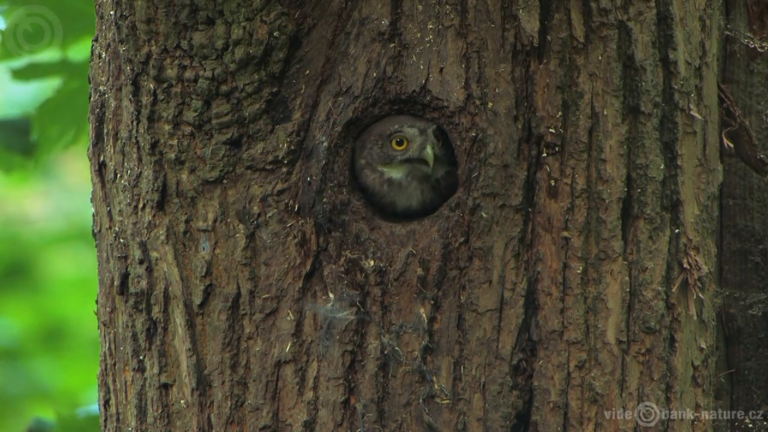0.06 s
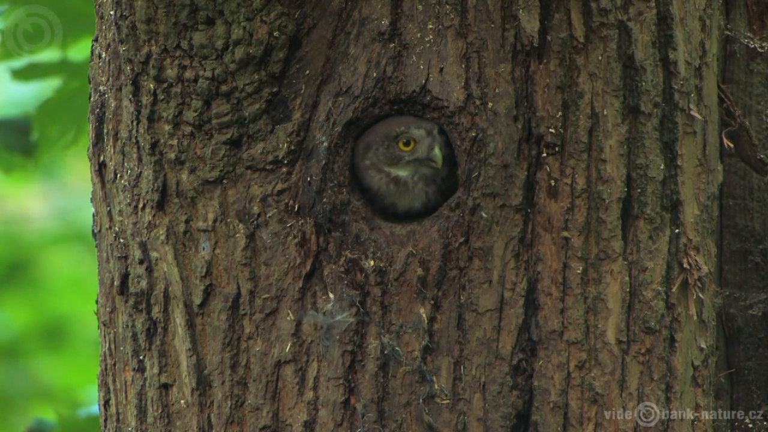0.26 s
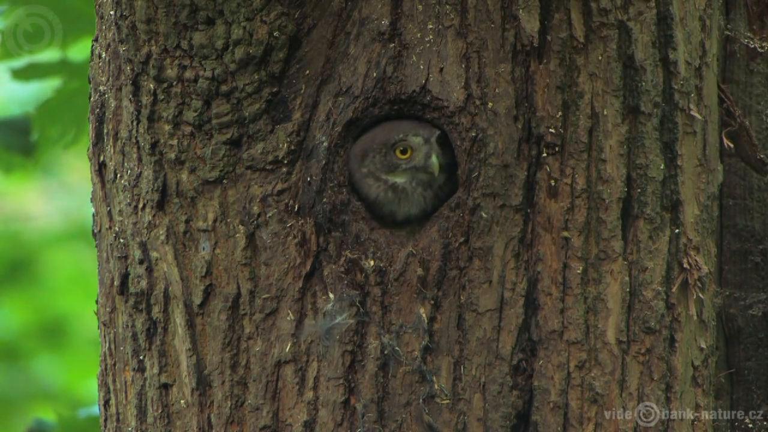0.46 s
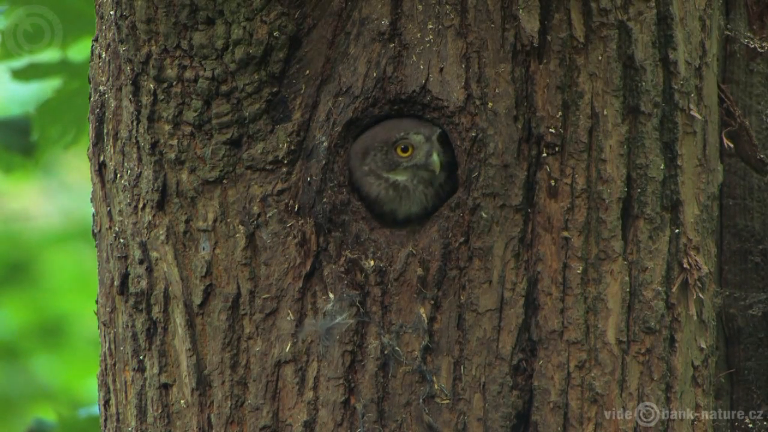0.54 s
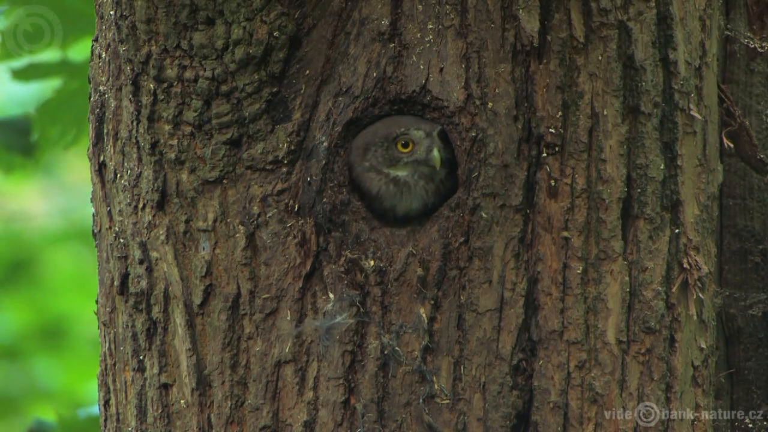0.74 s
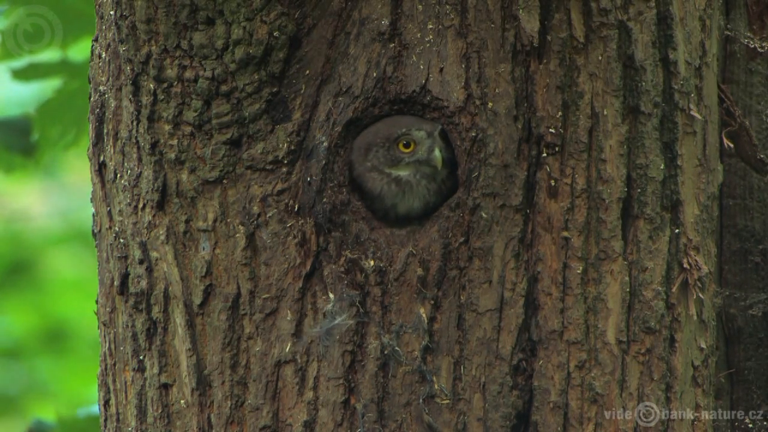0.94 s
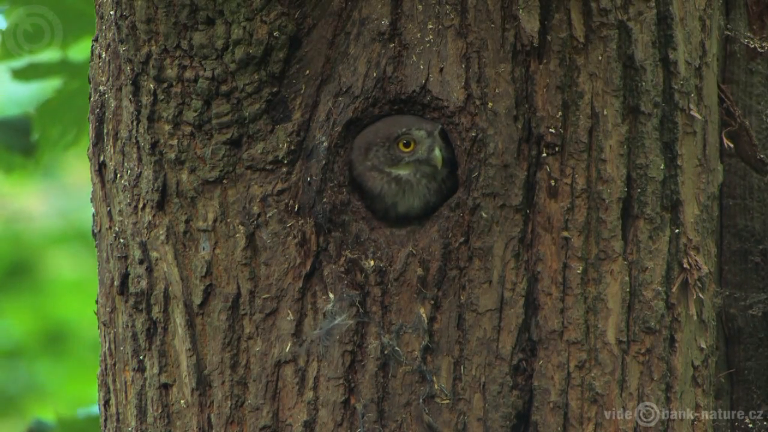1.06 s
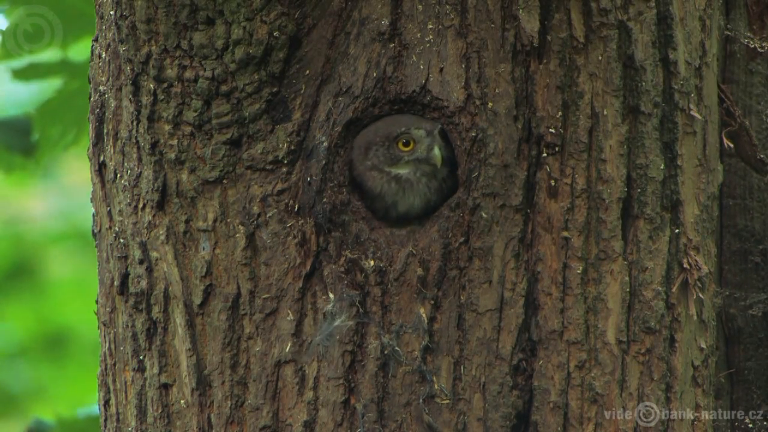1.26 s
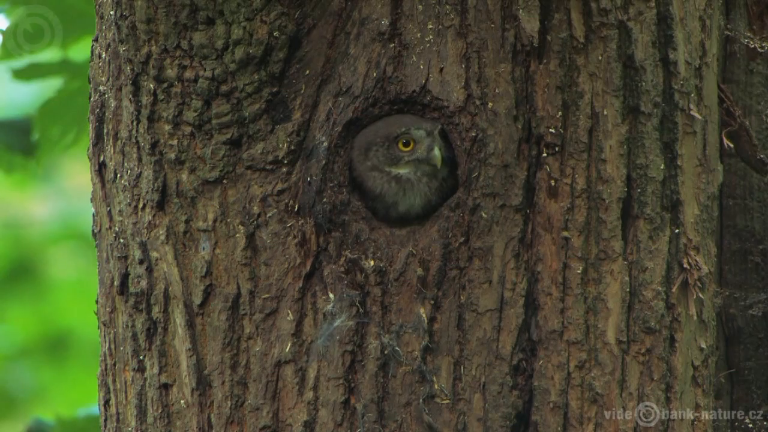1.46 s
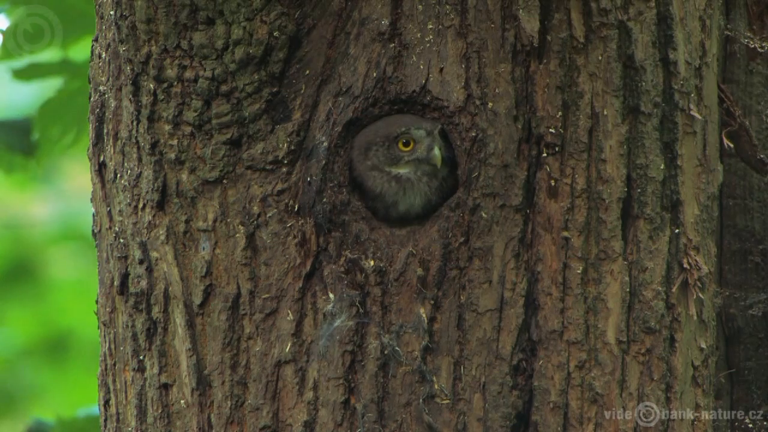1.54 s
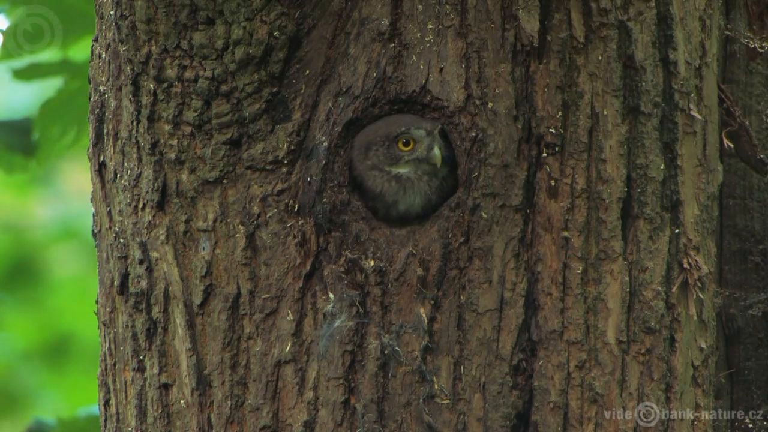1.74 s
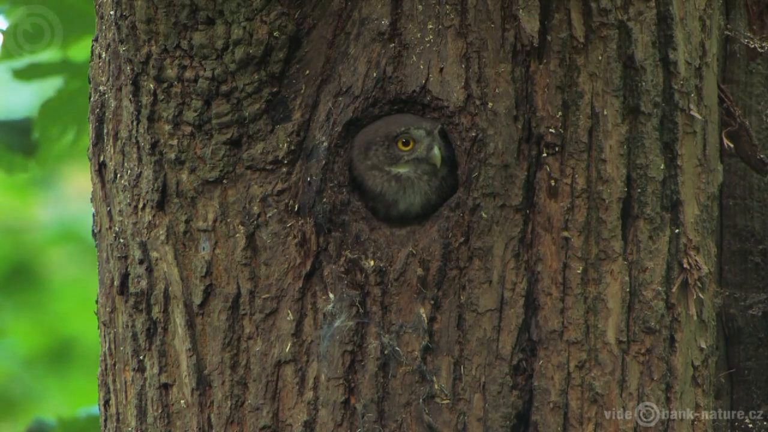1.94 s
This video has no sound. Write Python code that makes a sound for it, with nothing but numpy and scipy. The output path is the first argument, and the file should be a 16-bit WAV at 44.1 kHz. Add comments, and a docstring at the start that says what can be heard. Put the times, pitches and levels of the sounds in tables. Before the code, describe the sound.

In quiet woodland, a nearby owl whistles a brief, thin, very high note. About a second later it adds a softer trembling call that rises and falls, over distant birdsong, low hum and faint hiss.

```python
"""Woodland, with a distant rumble, a low hum and faint hiss, almost all centred on the microphone.
A thin, high whistle fades out at the start as, at 0.2 s, a pygmy owl gives one short, close note.
Far songbirds blur into a band around 3.5 kHz, and a faint low tone passes at 1 s.
From 1.2 s the owl whistles a longer, softer, quavering arch that the trunks scatter.
Just after it comes a soft tick in the undergrowth."""
import sys
import numpy as np
from scipy import signal
from scipy.fft import rfft, irfft
from scipy.io import wavfile
from scipy.ndimage import uniform_filter1d

SR = 44100
rng = np.random.default_rng(int(sys.argv[2]) if len(sys.argv) > 2 else 0)


def dump(signal):
    """Clip the signal to [-1, 1] and save it as 16-bit WAV at the path in sys.argv[1]."""
    limited = np.clip(np.atleast_2d(signal).T, -1, 1)
    pcm = np.round(limited * 32767).astype(np.int16)
    wavfile.write(sys.argv[1], SR, pcm)


N = 88200
LEAD = SR // 4  # samples before t = 0, so the wood is already ringing
TIME = np.arange(-LEAD, N) / SR


def from_db(db):
    """Decibels to gain."""
    return 10 ** (np.asarray(db) / 20)


def unit_rms(x):
    """Scale to rms 1."""
    return x / np.sqrt(np.mean(x ** 2) + 1e-20)


def curve(rows, column=1):
    """One column of a table, joined by straight lines in time."""
    rows = np.array(rows)
    return np.interp(TIME, rows[:, 0], rows[:, column])


def envelope(rows, column=1):
    """Smoothed gain from a level column, silent outside the table."""
    inside = (TIME >= rows[0][0]) & (TIME <= rows[-1][0])
    return uniform_filter1d(from_db(curve(rows, column)) * inside, size=60)


def wobble(rate_hz):
    """Random motion up to a given rate, rms 1."""
    sos = signal.butter(2, rate_hz, fs=SR, output="sos")
    return unit_rms(signal.sosfilt(sos, rng.standard_normal(len(TIME) + SR))[SR:])


def tremble(low_hz, high_hz):
    """Fast random flutter between two rates, rms 1."""
    sos = signal.butter(6, [low_hz, high_hz], "band", fs=SR, output="sos")
    return unit_rms(signal.sosfilt(sos, rng.standard_normal(len(TIME))))


def coloured(spectrum):
    """Steady noise with a given spectral shape, rms 1."""
    hz, db = np.transpose(spectrum)
    bins = np.maximum(np.fft.rfftfreq(len(TIME), 1 / SR), 1)
    shape = from_db(np.interp(np.log(bins), np.log(hz), db))
    return unit_rms(irfft(rfft(rng.standard_normal(len(TIME))) * shape, len(TIME)))


def scatter(x, t60_s, build_s):
    """Dense echoes that build up and die away, at unit power gain."""
    t = np.arange(SR) / SR
    echoes = rng.standard_normal(SR) * from_db(-60 * t / t60_s) * (1 - np.exp(-t / build_s))
    return signal.fftconvolve(x, echoes / np.sqrt(np.sum(echoes ** 2)))[:len(x)]


NEAR_T60_S, WOOD_T60_S, WOOD_BUILD_S = .2, .6, .0091
def woodland(x, direct_db, near_db, tail_db):
    """What reaches the microphone: direct sound, scatter from nearby bark and the tail of the wood."""
    near = from_db(near_db) * scatter(x, NEAR_T60_S, build_s=.0011)
    tail = from_db(tail_db) * scatter(x, WOOD_T60_S, WOOD_BUILD_S)
    return from_db(direct_db) * x + near + tail


# Spectrum of the background: f/Hz, relative level/dB
AIR_COLOUR = [(20, -27), (32, -10.5), (48, -4.5), (64, -8), (84, 0.5), (105, -1), (125, -2), (180, -1.5),
              (250, -4.5), (350, -8.5), (560, -10), (900, -14.5), (1700, -20.5), (2650, -21.5),
              (3350, -23.5), (4600, -30), (6000, -33.5), (9000, -39), (15500, -43)]
# Its slow swell: t/s, gain/dB
AIR_SWELL = [(0, 0), (.4, -0.84), (.8, -0.15), (1.2, 0.2), (1.6, 0), (2, 0)]
def air():
    """The bed of the place: distant rumble thinning into faint hiss."""
    return from_db(-47.5 + curve(AIR_SWELL)) * coloured(AIR_COLOUR)


# Hiss that differs between left and right: f/Hz, relative level/dB
SIDE_HISS = [(100, -35), (500, -16.5), (1500, -30), (2000, -9), (3400, 2.5), (6000, -1.5), (10000, -5),
             (15500, -5.5)]
def wide_hiss():
    """A trace of hiss to either side of the microphone."""
    return from_db(-68.5) * coloured(SIDE_HISS)


# Tones of the hum: f/Hz, level/dB before the swell
HUM_TONES = [(83, -61.5), (150, -53), (300, -62)]
# Their slow swell: t/s, gain/dB
HUM_SWELL = [(0, 0), (.6, 1), (1.2, 0), (1.5, 0.5), (1.85, 3), (2, -0.5)]
def hum():
    """A distant, nearly steady hum of three low tones that drift in pitch together."""
    phase_per_hz = 2 * np.pi * np.cumsum(1 + .004 * wobble(9)) / SR
    tones = sum(from_db(db) * np.sqrt(2) * (1 + .12 * wobble(3.5)) * np.sin(hz * phase_per_hz)
                for hz, db in HUM_TONES)
    return from_db(curve(HUM_SWELL)) * tones


def low_tone(peak_s=1.02, width_s=.05, hz=235):
    """One faint low tone that swells and fades in the distance."""
    swell = np.exp(-((TIME - peak_s) / width_s) ** 2 / 2)
    return from_db(-53) * np.sqrt(2) * swell * np.sin(2 * np.pi * hz * TIME)


# Far chorus, blurred by the wood: t/s, level/dB
CHORUS_LEVEL = [(0, -60.5), (.3, -59.5), (.5, -59), (.9, -60), (1.15, -57), (1.3, -56.5), (1.55, -57),
                (1.8, -59), (2, -63.5)]
# Its spectrum: f/Hz, relative level/dB
CHORUS_COLOUR = [(2000, -38), (2800, -7), (3100, 0.5), (3400, 1), (3750, -3.5), (4300, -10), (5200, -31)]
def chorus():
    """Many distant birds merged into one flickering band."""
    return from_db(curve(CHORUS_LEVEL) + 1.12 * wobble(22)) * coloured(CHORUS_COLOUR)


# Songbird notes far off in the trees: t/s, length/s, start f/Hz, end f/Hz, relative level/dB
SONG_NOTES = [(0.332, 0.19, 3705, 3670, -62), (0.475, 0.048, 3130, 3406, -57),
              (.60, 0.072, 3660, 3310, -58), (0.601, 0.063, 2087, 1960, -61),
              (0.753, 0.23, 3390, 3170, -58.5), (1.153, 0.046, 4160, 3900, -55.5),
              (1.192, 0.0316, 3496, 3270, -44.5), (1.238, 0.027, 3140, 3360, -63),
              (1.26, 0.14, 2249, 2250, -59), (1.323, 0.056, 3283, 3572, -50.5),
              (1.401, 0.069, 3934, 4300, -51.5), (1.427, 0.12, 3580, 3150, -57.5),
              (1.458, 0.102, 4460, 4180, -58), (1.489, .06, 4078, 3416, -51.5),
              (1.575, 0.05, 3290, 3715, -57), (1.63, 0.037, 3090, 3340, -60),
              (1.68, 0.061, 3760, 3390, -55.5), (1.79, 0.078, 3980, 3350, -57.5)]
def songbirds():
    """Far, warbling glides that reach the microphone mostly as echoes."""
    song = 0
    for start_s, length_s, start_hz, end_hz, db in SONG_NOTES:
        along = np.clip((TIME - start_s) / length_s, 0, 1)
        hz = (start_hz + (end_hz - start_hz) * along) * (1 + .026 * wobble(70))
        gain = from_db(db) * np.sqrt(2 * np.abs(np.sin(np.pi * along)))
        song = song + gain * np.sin(2 * np.pi * np.cumsum(hz) / SR)
    near = from_db(-5.5) * scatter(song, NEAR_T60_S, build_s=.0016)
    tail = from_db(-4) * scatter(song, t60_s=1, build_s=.0071)
    return from_db(-6) * song + near + tail


def tick(start_s=1.81, t60_s=.061):
    """A soft, dull tick in the undergrowth: a noise burst that dies quickly."""
    since = TIME - start_s
    decay = (since > 0) * from_db(-46 - 60 * np.abs(since) / t60_s)
    return decay * coloured([(150, -19), (700, 17), (2200, -3), (5000, -28)])


def whistle(hz, gain, waver, rasp, flutter_hz, share_above):
    """A wavering near sine and its octave; bursts of half-regular flutter add a husky fringe."""
    hz = uniform_filter1d(hz, size=20) * (1 + waver * wobble(99))
    phase = 2 * np.pi * np.cumsum(hz) / SR
    huskiness = rasp * from_db(3.5 * wobble(60))
    flutter = np.exp(2j * np.pi * np.cumsum(flutter_hz * (1 + .25 * wobble(82))) / SR)
    # share_above of the flutter's power lies above the tone, the rest below
    sidebands = np.sqrt(share_above) * flutter + np.sqrt(1 - share_above) / flutter
    grain = .5 * (tremble(140, 710) + 1j * tremble(100, 550))
    amplitude = np.sqrt(2) * gain * (1 + huskiness * (sidebands + grain))
    return (amplitude * np.exp(1j * phase)).imag, (amplitude * np.exp(2j * phase)).imag


# Thin whistle, further off than the owl: t/s, f/Hz, relative level/dB
THIN_WHISTLE = [(-.1, 7370, -60), (.01, 7520, -64), (.055, 7530, -60), (.09, 7560, -65), (.14, 7575, -53.5),
                (.18, 7670, -66), (.225, 7550, -52.5), (.26, 7500, -67.5)]
def thin_call():
    """A faint, grainy whistle of almost level pitch, with a breathy edge above it."""
    hz = curve(THIN_WHISTLE)
    gain = envelope(THIN_WHISTLE, column=2) * from_db(4.6 * wobble(60))
    flutter = dict(flutter_hz=200, share_above=.5)
    tone, _ = whistle(hz, gain, waver=.0029, rasp=.22, **flutter)
    edge, _ = whistle(hz + 500, gain * from_db(-22), waver=.0052, rasp=.45, **flutter)
    return woodland(tone + edge, direct_db=.5, near_db=-12, tail_db=-7)


# The owl's whistle catches as it starts or stops: t/s, level/dB
CATCHES = [(.226, -50.5), (.376, -50.5), (1.226, -66)]
# Spectrum of a catch: f/Hz, relative level/dB
CATCH_COLOUR = [(5000, -37), (6300, 8.5), (7400, 18.5), (8500, -37), (11000, -24.5), (12500, -14),
                (13500, -14), (15500, -25.5)]
def owl_catches(width_s=.012):
    """Brief hissy scrapes at the edges of the owl's notes."""
    bursts = sum(from_db(db) * np.exp(-((TIME - s) / width_s) ** 2 / 2) for s, db in CATCHES)
    return bursts * coloured(CATCH_COLOUR)


# Pitch of the arch between quavers: t/s, f/Hz
LONG_PITCH = [(1.21, 5550), (1.224, 5750), (1.24, 6370), (1.275, 6500), (1.31, 6690), (1.37, 6870),
              (1.43, 6920), (1.53, 6935), (1.61, 6850), (1.69, 6770), (1.772, 6740)]
# Its loudness before quavers and echoes: t/s, level/dB
LONG_LEVEL = [(1.208, -72), (1.228, -64), (1.25, -51), (1.28, -58), (1.297, -48), (1.39, -54.5),
              (1.44, -47.5), (1.48, -57), (1.50, -49), (1.565, -53), (1.605, -45.5), (1.665, -51),
              (1.71, -53), (1.74, -52.5), (1.772, -54)]
# Its octave overtone: t/s, level/dB against the fundamental
LONG_OCTAVE = [(1.225, -10), (1.27, -15), (1.31, -22), (1.45, -23), (1.62, -23), (1.77, -24)]
# Its huskiness, greatest on the crest: t/s, share of the tone
LONG_RASP = [(1.25, .08), (1.38, .13), (1.44, .22), (1.58, .2), (1.63, .11), (1.77, .1)]
# Its quavers: t/s, rate/Hz, typical pitch drop/Hz, level drop/dB
QUAVERS = [(1.22, 110, 150, 2), (1.255, 110, 300, 3), (1.277, 120, 800, 4), (1.31, 130, 560, 3),
           (1.37, 85, 650, 9), (1.43, 62, 500, 17), (1.50, 55, 80, 7), (1.57, 62, 150, 12),
           (1.61, 66, 750, 18), (1.675, 75, 750, 17), (1.695, 125, 760, 5), (1.718, 135, 900, 3),
           (1.742, 125, 650, 7), (1.77, 115, 780, 4)]
def owl_long_call(fall_s=.0024, recover_s=.0012):
    """The softer arch among the trunks: each quaver, slowest on the crest, flicks down into a gap."""
    rate = curve(QUAVERS)
    along = np.cumsum(rate * (1 + .32 * wobble(100))) / SR % 1  # 0 to 1 through each quaver
    fall = np.exp(-((1 - along) / rate / fall_s) ** 2)
    recover = np.exp(-(along / rate / recover_s) ** 2)
    uneven = np.clip(1 + .3 * wobble(123), .2, 1.2)
    hz = curve(LONG_PITCH) - fall * curve(QUAVERS, column=2) * uneven
    gaps = from_db(-(fall ** 2 + recover) * curve(QUAVERS, column=3))
    gain = envelope(LONG_LEVEL) * gaps * np.exp(.18 * wobble(110))
    voice = dict(rasp=curve(LONG_RASP), flutter_hz=440, share_above=.85)
    tone, _ = whistle(hz, gain, waver=.003, **voice)
    _, octave = whistle(hz, gain * from_db(curve(LONG_OCTAVE)), waver=.006, **voice)
    return woodland(tone + octave, direct_db=0, near_db=-8, tail_db=-6)


# Pitch of the close note: t/s, f/Hz
SHORT_PITCH = [(.208, 6620), (.229, 6925), (.25, 6990), (.266, 7062), (.293, 7035), (.318, 7115),
               (.34, 7265), (.353, 7275), (.365, 7160), (.377, 6740)]
# Its loudness: t/s, relative level/dB
SHORT_LEVEL = [(.203, -63.5), (.222, -49), (.231, -35), (.27, -33), (.294, -35.5), (.322, -31),
               (.35, -31.5), (.374, -34), (.378, -59)]
# Its octave overtone: t/s, level/dB against the fundamental, before throat and wood
SHORT_OCTAVE = [(.24, -18.5), (.29, -20.5), (.34, -26.5), (.372, -19)]
def owl_short_call(throat_band_hz=(6660, 7510)):
    """A clear note close to the microphone: it rises, drops away and leaves a huskier echo."""
    hz = uniform_filter1d(curve(SHORT_PITCH), size=300)
    gain = envelope(SHORT_LEVEL)
    flutter = dict(flutter_hz=320, share_above=.45)
    tone, octave = whistle(hz, gain, waver=.00034, rasp=.17, **flutter)
    husky, _ = whistle(hz, gain, waver=.0022, rasp=.4, **flutter)
    throat = signal.butter(5, throat_band_hz, "band", fs=SR, output="sos")
    tone, husky = signal.sosfilt(throat, [tone, husky])
    near = from_db(-12.5) * scatter(tone, NEAR_T60_S, build_s=.00085)
    tail = from_db(-21.5) * scatter(husky, WOOD_T60_S, WOOD_BUILD_S)
    overtone = woodland(octave * from_db(curve(SHORT_OCTAVE)), direct_db=-1.5, near_db=-23, tail_db=-20)
    return from_db(1.5) * tone + near + tail + overtone


def scene():
    """Birds, hum and rumble straight ahead; only a little hiss and the first bark echoes are wide."""
    close_note = owl_short_call()
    birds = owl_long_call() + thin_call() + owl_catches() + songbirds() + chorus()
    centre = birds + tick() + hum() + low_tone() + air()
    side = wide_hiss() + from_db(-32.5) * scatter(close_note, t60_s=.043, build_s=.002)
    pan = from_db([[-.05], [.05]])  # a hair to the right
    return (np.array([centre + side, centre - side]) + pan * close_note)[:, LEAD:]


def record(dry, cutoff_hz=15800):
    """The microphone signal, with its top cut steeply."""
    return signal.sosfilt(signal.ellip(12, .1, 80, cutoff_hz, fs=SR, output="sos"), dry)


dry = scene()
out = record(dry)
dump(out)
```